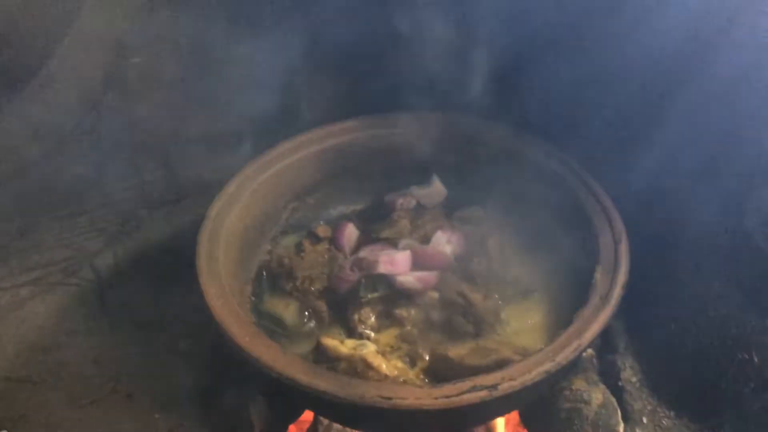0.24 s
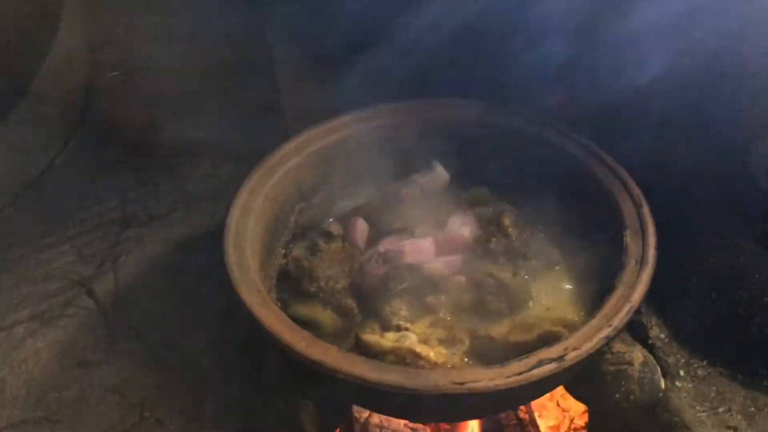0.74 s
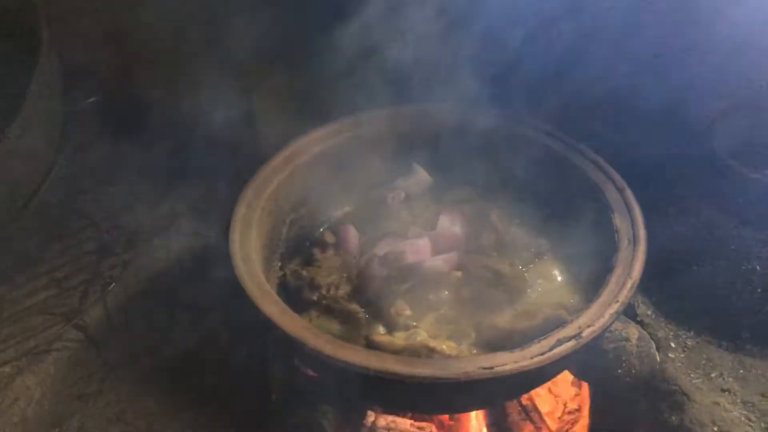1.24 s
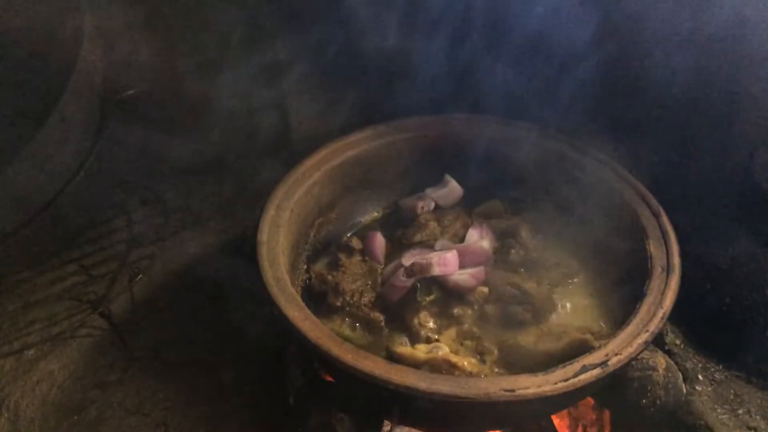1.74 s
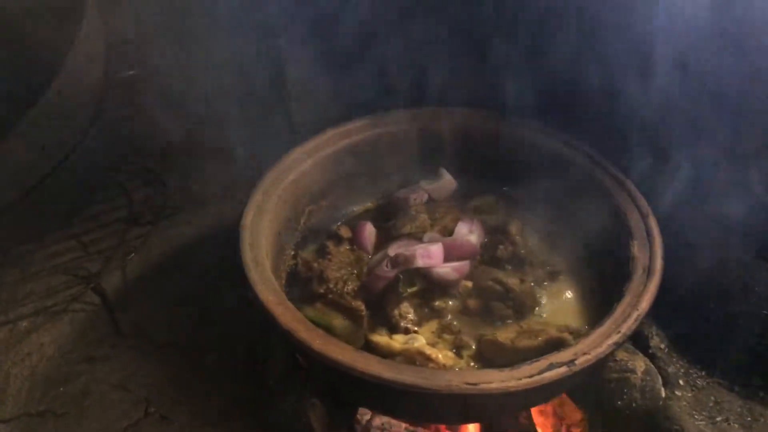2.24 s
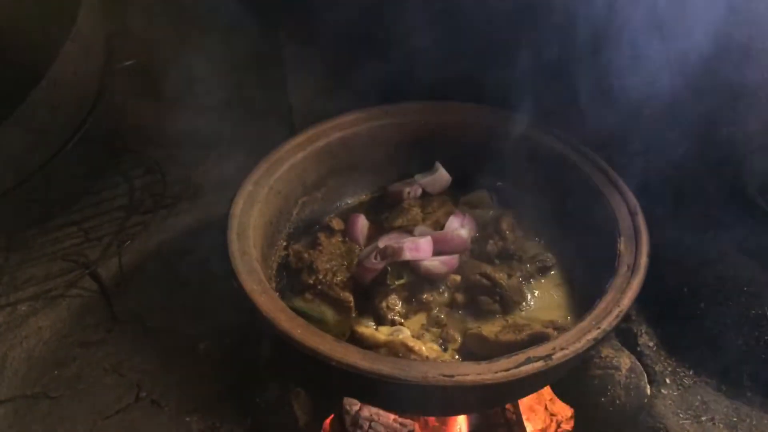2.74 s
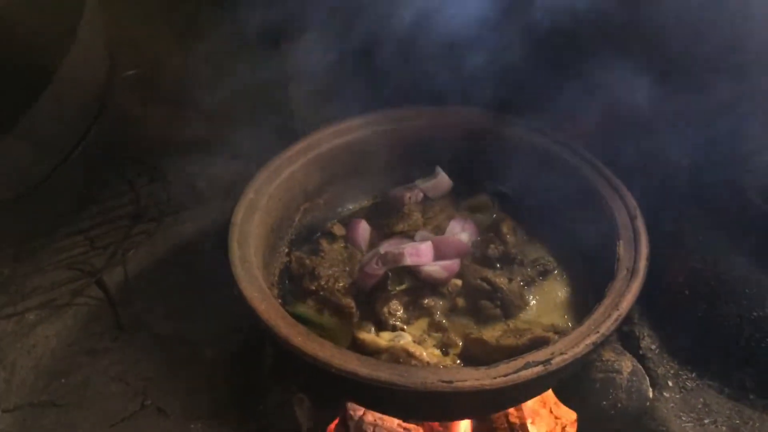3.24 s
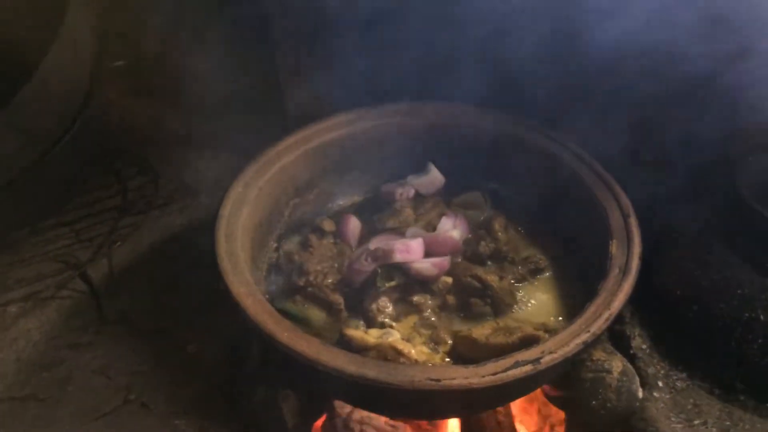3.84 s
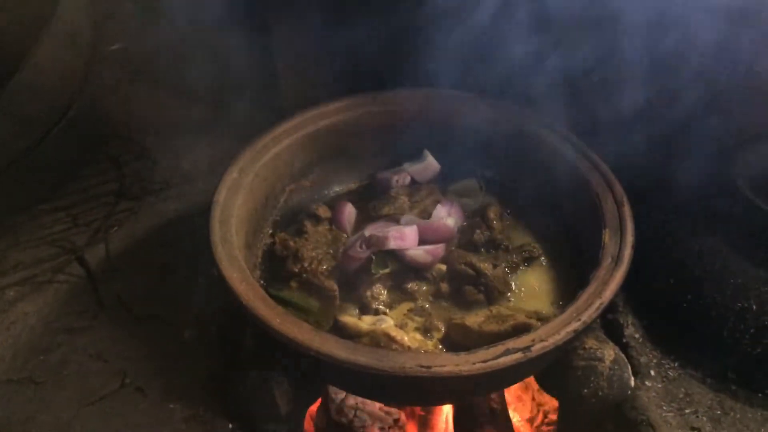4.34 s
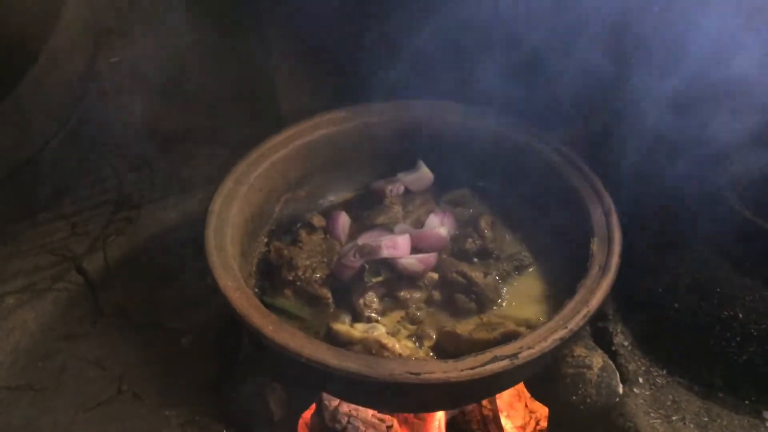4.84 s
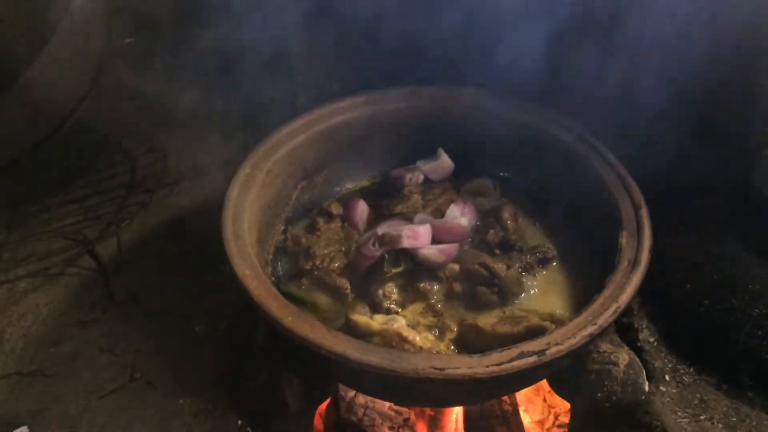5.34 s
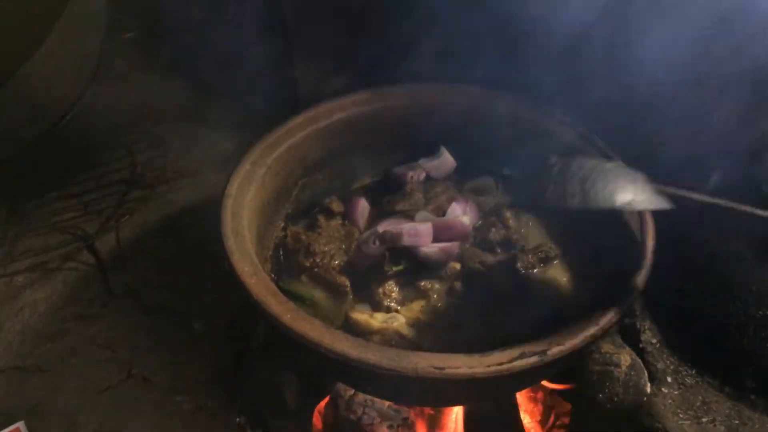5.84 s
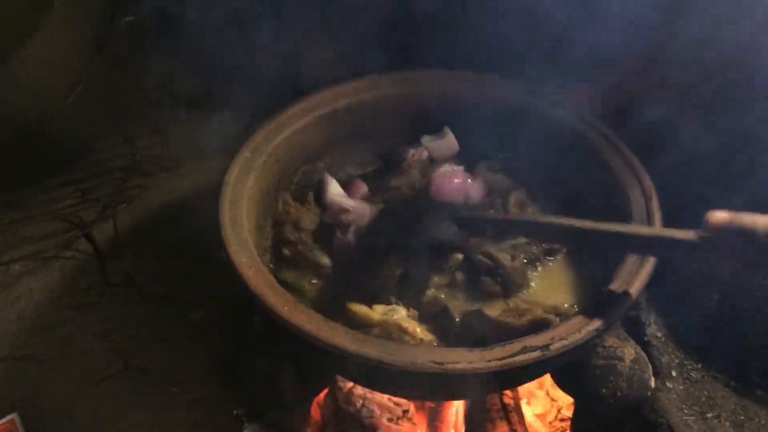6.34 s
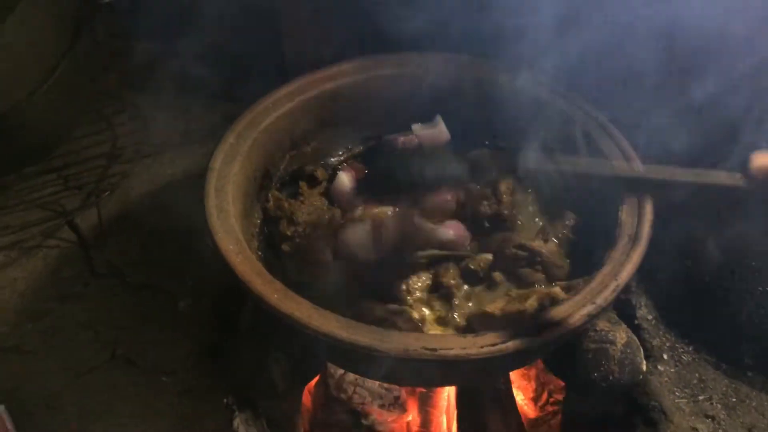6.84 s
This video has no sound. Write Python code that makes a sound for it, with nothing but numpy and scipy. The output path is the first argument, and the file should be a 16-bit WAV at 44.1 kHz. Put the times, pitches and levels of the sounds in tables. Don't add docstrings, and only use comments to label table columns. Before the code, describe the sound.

A cow lows close by from the very start, sagging into a groan and sigh, then a clay pot simmers over fire until a ladle knocks it.

```python
import sys
import numpy as np
from scipy import signal
from scipy.fft import rfft, irfft, next_fast_len
from scipy.io import wavfile
from scipy.ndimage import uniform_filter1d, map_coordinates

SR = 44100
rng = np.random.default_rng(int(sys.argv[2]) if len(sys.argv) > 2 else 0)


def int16_out(signal):
    q = np.round(np.clip(np.atleast_2d(signal).T, -1, 1) * 32767)
    wavfile.write(sys.argv[1], SR, q.astype(np.int16))


def boost(x):
    u = np.asarray(x, float) / 20
    return 10 ** u


N = 313110
TIME = np.arange(N) / SR

# [time_s, pitch_hz, effort_db, brightness_db]
HUM = [
    (0, 100.2, -43, -12.5),
    (.188, 108.9, -47, 3),
    (.245, 108.7, -54, 2),
]
# [time_s, pitch_hz, effort_db, brightness_db]
OPEN_CALL = [
    (0.261, 107.9, -20, 6.5),
    (.385, 115, -20, 0),
    (.5, 113.1, -20.5, -1.5),
    (.85, 110, -24.5, 4),
    (1.037, 103.4, -25, 4),
    (1.136, 101.9, -24.5, 6.5),
    (1.51, 90.06, -27.5, 8),
    (1.64, 77.74, -26, -6.5),
    (1.765, 67.5, -38.5, -10),
]
# [start_s, end_s]
MOUTH_OPENS = (0.225, 0.252)
# [start_s, end_s]
THROAT_SLACKENS = (0.704, 0.82)
# [frequency_hz, gain_db]
NOSE = [(410, -46.5), (700, -8.5), (1150, -26), (1400, -10.5), (1600, -13.5), (2000, -18), (2250, -5),
        (2360, 7), (2600, -20), (2940, -38), (3200, -15), (3420, -10.5), (3960, -51), (4300, -31.5),
        (5590, -37.5), (9460, -93)]
# [frequency_hz, gain_db]
BELLOW = [(410, -31.5), (700, -11.5), (881, 1), (1150, 5.5), (1450, -13.5), (1560, -7.5), (1720, -13.5),
          (1950, -12.5), (2070, -16), (2890, -20.5), (3960, -33), (5080, -45), (5700, -40.5), (6900, -44.5),
          (8970, -91.5), (15200, -120)]
# [frequency_hz, gain_db]
GROAN = [(350, -50), (600, 7), (807, 2.5), (912, 8), (1140, 7.5), (1490, -5.5), (2590, -18), (2870, -25),
         (3700, -30), (4100, -26), (4680, -39), (6900, -37), (8970, -79), (15200, -120)]
# [centre_hz, half_width_hz, gain_db]
MOUTH_RIDGES = [(1110.5, 30, 7.5), (1582, 22, 8.5), (1995, 59, 3.5), (2200, 35, 12.5), (2551, 51, 10),
                (2916, 38, 12.5), (3420, 150, 4.5), (4000, 20, 11)]
# [start_hz, end_hz, half_width_hz, gain_db]
NOSE_GLIDE = (1574, 1320, 70, 12.8)
# [centre_hz, width_hz, level_over_effort_db]
LOW_NOSE = [(110.5, 11, 13), (217, 36, 1.5), (332, 22, 11), (432, 63, 14.5), (640, 66, 6.5)]
# [centre_hz, width_hz, level_over_effort_db]
LOW_MOUTH = [(109.6, 62, -22), (225, 27, -4), (326.5, 12.7, -12), (445, 44, -6), (552, 76, -10),
             (712.4, 40.3, 0)]
# [centre_hz, width_hz, level_over_effort_db]
LOW_SLACK = [(94, 14, -18.5), (138.6, 22, -6.5), (186, 23.4, -5), (226, 8.2, -0.5), (257.6, 26.7, 7.5),
             (333, 71, -5.5), (478.5, 76, 2), (543.6, 17, 2.5)]
# [time_s, depth_db, half_length_s]
FALTERS = [
    (1.003, 4.5, 0.011),
    (1.244, 4.5, 0.062),
    (1.411, 4.5, 0.022),
    (1.656, 2, 0.026),
]
# [time_s, half_length_s, centre_hz, gain_db]
SWAYS = [(0.258, 0.033, 220, -5), (.272, .025, 820, -26), (.272, .018, 1260, -14.5), (0.32, .012, 1200, -7),
         (0.32, .03, 667, 14.5), (0.38, 0.054, 340, 13), (0.51, 0.027, 925, 3), (0.36, 0.027, 1033, -17),
         (.268, 0.0057, 445, 9), (.54, 0.047, 1125, -1), (0.655, .045, 560, -15),
         (0.714, 0.074, 885, -11.5), (0.71, .07, 1122, 1), (0.692, 0.053, 1570, -12),
         (0.764, 0.14, 1330, 10), (0.86, 0.065, 1000, -12), (.8, 0.092, 720, 13), (.8, .04, 1105, -4),
         (0.972, 0.076, 740, 7), (1.04, 0.025, 1150, 6), (1, 0.054, 310, -1), (1.078, 0.081, 103, -7),
         (1.17, 0.07, 720, 10), (1.5, 0.021, 1120, -3), (1.23, 0.062, 790, -14), (1.34, 0.072, 946, 10.5),
         (1.32, 0.092, 190, 1.5), (1.27, 0.093, 900, -10), (1.37, 0.06, 1040, -18),
         (1.449, 0.022, 920, 11.5), (1.42, 0.12, 367.8, -22.5), (1.52, 0.02, 720, 11),
         (1.6, .03, 1140, 3.5), (0.46, .04, 1145, 2.5), (.3, 0.018, 2200, 5), (.31, .03, 1540, 3),
         (0.41, .1, 1920, 8.5), (0.31, .08, 2370, -5), (0.59, 0.11, 1800, 4.5), (.77, 0.043, 2530, 12.5),
         (.86, 0.031, 1870, 14.5), (0.69, .06, 2130, 14), (0.73, .08, 1700, -8.5), (1.1, 0.037, 3100, -11),
         (1.03, .04, 1860, 11), (0.99, 0.053, 1800, 2), (1.18, 0.12, 1630, -20), (1.35, 0.057, 2000, 5.5),
         (1.36, .05, 1700, 6), (1.64, 0.068, 1650, 23)]
# [start_s, attack_s, hold_s, level_db, fall_db_per_s]
SIGH = [
    (1.6, 0.048, 0.36, -32.5, 114),
    (1.74, 0.048, 0.05, -44, 100),
    (2.15, 0.047, 0.018, -49, 151),
]
# [centre_hz, width_hz, gain_db]
SIGH_THROAT = [(439.5, 81, -2.5), (699, 15.6, 3), (856, 22, 2.5), (1167, 25, -6.5), (1480, 130, -5.5),
               (1665, 35, 0), (1820, 41, -3), (2200, 33, -14), (2200, 31, -14), (2480, 80, -12),
               (2900, 63, -10), (3420, 48, -46)]
# [start_s, attack_s, hold_s, level_db, fall_db_per_s]
STRAW = [
    (.325, 0.071, 0.0012, -46.5, 292),
    (.97, 0.078, 0.0012, -49, 31),
    (1.3, 0.013, 0.083, -44, 164),
    (1.42, 0.041, 0.0075, -38, 210),
    (1.6, 0.0072, 0.09, -41.5, 176),
    (1.808, 0.0093, 0.042, -42.5, 144),
    (1.898, 0.027, 0.0037, -50.5, 86),
    (2.14, 0.065, 0.039, -67.5, 170),
]
# [frequency_hz, density_db_per_hz]
STRAW_TONE = [(1470, -39), (2500, -6.5), (3010, -0.5), (4030, -7.5), (7530, -9.5), (13100, -22),
              (15800, -25)]
# [time_s, level_db, softness_hz, damping_by_stew (1 = free rim)]
KNOCKS = [
    (5.9433, -19, 2560, 0.96),
    (5.972, -23.5, 498, 1.3),
    (5.993, -31, 500, 1.8),
    (6.3822, -12, 950, 3.4),
    (6.3939, -20, 500, 1.3),
    (6.691, -30, 1205, 1.5),
    (6.708, -28.5, 500, 0.92),
]
# [pitch_hz, level_db, t60_s]
POT_MODES = [(349, 1, 0.053), (429.5, -0.5, 0.068), (874, -10.5, 0.088), (945, -7, 0.16), (990, -14, 0.1),
             (1280, -10, 0.053), (1366, -10, 0.098), (1760, -4.5, 0.17), (1786, -8.5, 0.19),
             (1874, -5, 0.073), (2755, -27.5, 0.47), (2810, -34, 0.32), (3850, -11, 0.087),
             (4300, -4, 0.035)]
# [time_s, level_db]
SNAPS = [
    (6.591, -28),
    (7.092, -26),
]
# [frequency_hz, density_db_per_hz]
SNAP_TONE = [(350, -41), (600, -11), (1350, -6), (1790, -9), (2590, -8.5), (3140, -1), (4670, -5),
             (6400, -2.5), (15800, -17.5)]
# [start_s, attack_s, hold_s, level_db, fall_db_per_s]
SCRAPE = [
    (6.31, 0.023, 0.06, -44, 370),
    (6.43, 0.022, 0.006, -69, 80),
]
# [frequency_hz, density_db_per_hz]
GRIT_TONE = [(880, -9), (1500, 2), (1830, -2), (2080, -14), (2960, 2), (3940, -1), (4840, -6), (6320, -2),
             (11900, -11), (15800, -48)]
# [start_s, attack_s, hold_s, level_db, fall_db_per_s]
SCRAPE_FIZZ = [
    (6.31, 0.013, 0, -58.5, 200),
    (6.42, 0.027, 0, -49, 131.5),
]
# [time_s, peak_db, pitch_hz, t60_s]
CATCHES = [(6.328, -38, 2790, 0.012), (6.338, -30, 5830, 0.027), (6.356, -38, 6100, 0.042),
           (6.374, -35, 3620, 0.02), (6.333, -36, 5600, .015), (6.342, -37, 3400, .015),
           (6.36, -39.5, 3200, .02), (6.367, -39.5, 5600, .015), (6.38, -37, 5500, .015),
           (6.401, -38.5, 5650, .02), (6.407, -39.5, 3900, 0.014), (6.45, -48, 5000, .02),
           (6.468, -43, 5000, .025), (6.388, -33.5, 4160, 0.034), (6.3957, -38.5, 4140, 0.023),
           (6.662, -36, 3800, 0.098), (6.6833, -36.5, 5000, 0.056), (6.69, -32.5, 6100, 0.046),
           (6.7, -35, 4830, 0.033), (6.718, -37, 4430, .03), (6.67, -41, 2100, 0.052),
           (6.693, -33, 4000, 0.055), (6.708, -28.5, 4000, 0.056), (6.7337, -35, 4000, 0.028)]
# [time_s, peak_db, pitch_hz, t60_s]
TICKS = [(4.122, -42, 3600, 0.025), (4.145, -34, 3600, 0.029), (4.162, -38, 1370, 0.09),
         (4.27, -40, 900, 0.031), (4.043, -48.5, 3600, .015), (4.225, -48, 2800, .015),
         (4.255, -45, 2700, .015), (4.562, -47, 3600, .02), (4.697, -47.5, 2800, 0.018),
         (4.755, -46, 3200, .015), (6.915, -50, 1300, .03), (6.522, -41, 1110, 0.022),
         (6.76, -41.5, 1800, 0.021), (6.792, -46, 2200, .015)]
# [time_s, peak_db, pitch_hz, t60_s]
CLICKS = [
    (3.198, -37, 1490, 0.016),
    (3.229, -37.5, 1750, 0.02),
    (3.2456, -38.5, 1200, .015),
    (4.145, -42, 1500, .025),
    (5.704, -45, 1500, .015),
    (5.236, -37, 1010, 0.018),
]
# [start_s, length_s, pitch_hz, level_db, unsteadiness_share]
CREAKS = [
    (4.08, 0.73, 1450, -63.5, .014),
    (5.58, 0.14, 1330, -61, .008),
    (5.695, 0.25, 1870, -66, .02),
    (1.87, 4, 363, -66, .012),
    (5.606, 0.32, 420, -63, .03),
    (4.2, 0.45, 3700, -69, .04),
    (4.3, .25, 4900, -72, .035),
    (4.25, .25, 5900, -71, .03),
    (2.73, .55, 850, -66, .03),
]
# [time_s, sizzle_db]
SIMMER = [
    (.2, -59),
    (2.35, -62),
    (3.96, -61.5),
    (4.45, -59),
    (4.98, -62),
    (6.32, -60),
    (6.54, -53.5),
    (6.77, -60.5),
]
# [frequency_hz, density_db_per_hz]
SIZZLE_TONE = [(1200, -16), (2000, -9), (2600, -4.5), (4750, -4), (9400, -5.5), (10000, -3), (10700, -6),
               (13800, -6.5), (15800, -10.5)]
# [time_s, draught_db]
FIRE = [(0, -45), (.35, -45), (.7, -49), (1.2, -49.5), (1.72, -43), (2.57, -48.5), (3.2, -44), (3.6, -46.5),
        (3.9, -46), (4.6, -46), (5.1, -51.5), (5.83, -44), (6.15, -48), (6.35, -45.5), (6.74, -48.5),
        (7.1, -46.5)]
# [frequency_hz, density_db_per_hz]
DRAUGHT_TONE = [(15, -57.5), (25, 0), (43, -5.5), (80, 2), (103, -16), (129, -3.5), (200, -18.5),
                (300, -27), (390, -40.5), (660, -120)]
# [time_s, peak_db, pitch_hz]
CRACKLES = [(2.6856, -42.5, 10500), (2.7203, -39, 7020), (2.8234, -47.5, 5060), (2.9995, -42.5, 9800),
            (3.1068, -39, 12800), (3.5406, -37.5, 12400), (3.6194, -36.5, 14500), (3.6958, -43, 5540),
            (3.7353, -40.5, 12800), (4.091, -31, 11600), (4.4272, -37, 9400), (4.753, -28, 11700),
            (5.3262, -49.5, 5600), (5.433, -46.5, 7560), (5.8598, -40.5, 10300), (5.907, -40.5, 10900),
            (5.942, -35, 6000), (5.9897, -36.5, 11900), (6.1814, -43.5, 13500), (6.313, -54.5, 6010)]
# [frequency_hz, density_db_per_hz]
YARD_TONE = [(150, -39.5), (250, -2), (321, -6), (387, 1.5), (416, -6.5), (462, -0.5), (518, -9),
             (936, -6.5), (1160, -9), (1360, -6.5), (1940, -12), (2410, -15), (3000, -20), (3900, -24),
             (6600, -120)]
# [frequency_hz, t60_s]
WALLS = [(150, 0.73), (1000, 0.59), (4000, 0.048), (12000, 0.0046)]

CALL = HUM + OPEN_CALL
CLEAR_SHARE, HOARSE_SHARE, CRACK_HZ, CRACK_SPAN_HZ = .013, .45, 85.5, 6.5
BURST_SHARE, BURST_S = .07, .12
BREATH_GATING = 2
PHASE_SCATTER = .5
JAW_S, JAW_LOWER, JAW_DULL_DB = 0.024, 0.18, 17.5
# (start s, full s), share of the pitch, size scatter
FRAY_S, FRAY_SHARE, FRAY_DB = (.95, 1.3), .0055, 5.5
SWAY_HALF_WIDTH_HZ = 45
ATTACK_RISE_DB = 14
YARD_DB, YARD_FOLLOWS = -58.5, 0.61
TOP_HZ = 15870


def unit(x):
    return x / np.sqrt(np.mean(x ** 2) + 1e-20)


def along(points, hz):
    f, v = np.transpose(points)
    return np.interp(np.log(hz + 1), np.log(f + 1), v)


def curves(rows):
    s, *columns = np.transpose(rows)
    return [np.interp(TIME, s, column) for column in columns]


def during(rows, fade_s):
    inside = np.minimum(TIME - rows[0][0], rows[-1][0] - TIME)
    return np.clip(1 + inside / fade_s, 0, 1)


def wobble(rate):
    knots = rng.standard_normal(int(N * rate / SR) + 4)
    return map_coordinates(knots, [TIME * rate])


def coloured(x, spectrum):
    m = 2 * next_fast_len(len(x) // 2 + 4096)
    gain = boost(along(spectrum, np.fft.rfftfreq(m, 1 / SR)))
    cepstrum = irfft(np.log(gain + 1e-6), m)
    cepstrum[1:m // 2] *= 2
    cepstrum[m // 2 + 1:] = 0
    return irfft(rfft(x, m) * np.exp(rfft(cepstrum)), m)[:len(x)]


def rush(spectrum, patchy_db, grit_db):
    z = signal.stft(rng.standard_normal(N), nperseg=512)[2]
    field = uniform_filter1d(rng.standard_normal(z.shape), size=6, axis=0)
    field = uniform_filter1d(field, size=10, axis=1)
    noise = signal.istft(z * boost(patchy_db * unit(field)), nperseg=512)[1][:N]
    return unit(coloured(noise * boost(grit_db * wobble(900)), spectrum))


def add(track, s, sound):
    part = track[round(s * SR):][:len(sound)]
    part += sound[:len(part)]


def strokes(rows):
    total = 0
    for s, attack, hold, db, fall in rows:
        rise_db = np.minimum(ATTACK_RISE_DB * ((TIME - s) / attack - 1), 0)
        fall_db = fall * np.maximum(TIME - s - attack - hold, 0)
        total = total + boost(db + rise_db - fall_db) * np.clip(1 + (TIME - s) / 0.0091, 0, 1)
    return total


def resonant(rows, hz):
    return np.sqrt(sum(boost(db) ** 2 / (1 + (2 * (hz - centre) / width) ** 2) ** 2 for centre, width, db in rows))


def head_sways(t, partial_hz):
    swayed_db = 0
    for s, half, centre, db in SWAYS:
        away = ((t[::8] - s) / half) ** 2 + ((partial_hz[:, ::8] - centre) / SWAY_HALF_WIDTH_HZ) ** 2
        swayed_db = swayed_db + db * np.exp(-away)
    return boost(swayed_db).repeat(8, axis=1)[:, :len(t)]


def drifting(t, partial_hz):
    place = [partial_hz[:, ::8] / 70, t[::8] * 15 + np.zeros((len(partial_hz), 1))]
    values = map_coordinates(rng.standard_normal((110, 50)), place, order=1)
    return values.repeat(8, axis=1)[:, :len(t)]


def cow():
    n = round((CALL[-1][0] + 0.054) * SR)
    t = TIME[:n]
    hz, effort_db, bright_db = (c[:n] for c in curves(CALL))
    effort_db = effort_db - sum(db * np.exp(-((t - s) / half) ** 2) for s, db, half in FALTERS)
    effort = boost(effort_db)
    slack = np.interp(t, THROAT_SLACKENS, [0, 1])
    mouth = np.interp(t, MOUTH_OPENS, [0, 1])
    parted = np.interp(t, [HUM[-1][0], OPEN_CALL[0][0]], [0, 1])
    opened_s = t - OPEN_CALL[0][0]
    burst = np.exp(-np.abs(opened_s) / BURST_S)
    jaw = parted * np.exp(-np.maximum(opened_s, 0) / JAW_S)

    breath = CLEAR_SHARE + HOARSE_SHARE / (1 + np.exp((hz - CRACK_HZ) / CRACK_SPAN_HZ))
    breath = breath + parted * BURST_SHARE * burst
    shake = breath * .012 + FRAY_SHARE * np.interp(t, FRAY_S, [0, 1])
    phase = 2 * np.pi * np.cumsum(hz * (1 + shake * wobble(45)[:n])) / SR
    k = np.arange(1, 64)[:, None]
    partial_hz = k * hz
    high = np.clip((partial_hz - 1300) / 500, 0, 1)

    opened_db = (1 - slack) * along(BELLOW, partial_hz * (1 + JAW_LOWER * jaw))
    opened_db += slack * along(GROAN, partial_hz)
    for centre, width, db in MOUTH_RIDGES:
        opened_db += db / (1 + ((partial_hz - centre) / width) ** 2)
    sinking_hz = np.interp(t, [0, HUM[-1][0]], NOSE_GLIDE[:2])
    glide_db = NOSE_GLIDE[3] / (1 + ((partial_hz - sinking_hz) / NOSE_GLIDE[2]) ** 2)
    nose_db = along(NOSE, partial_hz) + glide_db
    gain = boost((1 - mouth) * nose_db + mouth * opened_db)
    gain *= effort * np.sqrt(2 / np.sum(gain[6:14] ** 2, axis=0))
    gain *= boost((bright_db - JAW_DULL_DB * jaw) * high)

    low_hz = partial_hz[:6]
    low = (1 - slack) * resonant(LOW_MOUTH, low_hz) + slack * resonant(LOW_SLACK, low_hz)
    low = parted * low + (1 - parted) ** 3 * resonant(LOW_NOSE, low_hz)
    gain[:6] = np.sqrt(2) * effort * low
    gain[6:8] += np.sqrt(2) * effort * slack * resonant(LOW_SLACK, partial_hz[6:8])
    gain[6:] *= np.sqrt(1 - breath)
    gain[:26] *= head_sways(t, partial_hz[:26])

    wax, slip = drifting(t, partial_hz), drifting(t, partial_hz)
    gain[6:] *= boost(((1.5 + 5.5 * high) * np.tanh(wax))[6:])
    slip = (.15 + .85 * mouth) * partial_hz / 1500 * slip * (k > 6)
    slip = slip * (1 + 1.5 * burst) * (1 - breath)
    slip = slip + 2 * np.pi * PHASE_SCATTER * rng.random((63, 1))
    fray_db = FRAY_DB * np.interp(t, FRAY_S, [.15, 1]) * np.tanh(wobble(80)[:n])
    gain *= boost(fray_db * np.clip((partial_hz - 800) / 1200, 0, 1))
    tone = np.sum(gain * np.cos(k * phase + slip), axis=0)

    gate = np.exp(BREATH_GATING * breath * np.cos(phase))
    puffs = coloured(rng.standard_normal(n) * gate, [(700, -6.0), (1300, 0.5), (2500, 11.0), (5000, 9.5)])
    opened = (1 - slack) * unit(coloured(puffs, BELLOW)) + slack * unit(coloured(puffs, GROAN))
    air = mouth * opened + (1 - mouth) * unit(coloured(puffs, NOSE))
    rasp_tone = [(120, -12.0), (250, 7.5), (550, 18.5), (800, -23.5)]
    rasp = unit(coloured(rng.standard_normal(n) * gate, rasp_tone))
    low_rms = np.sqrt(np.sum(gain[1:6] ** 2, axis=0) / 2)
    voice = tone + np.sqrt(breath) * (effort * air + boost(-5.5) * low_rms * rasp)
    voice *= boost(2.5 * breath * wobble(70)[:n])
    return np.pad(voice, (0, N - n)) * during(CALL, 0.04)


def sigh():
    f = np.fft.rfftfreq(N, 1 / SR)
    throat, sign = 0, 1
    for centre, width, db in SIGH_THROAT:
        width = max(width, 28)
        throat = throat + sign * boost(db) * 1j * f * width / (centre ** 2 - f * f + 1j * f * width)
        sign = -sign
    air = unit(irfft(rfft(rng.standard_normal(N)) * throat, N))
    chest = [(130, -20), (230, -8), (400, -3), (700, -5), (1200, -4), (2000, -8), (3500, -20), (6000, -60)]
    air += .45 * rush(chest, patchy_db=3, grit_db=1.5)
    return boost(-3.5) * strokes(SIGH) * air


def ladle():
    out, t = np.zeros(N), np.arange(SR // 3) / SR
    for s, db, soft_hz, damping in KNOCKS:
        ring = 0
        for hz, level, t60 in POT_MODES:
            fading = boost(level + rng.normal(0, 0.44) - 60 * t * damping / t60)
            ring = ring + fading / (1 + (hz / soft_hz) ** 3) * np.sin(2 * np.pi * hz * t)
        clunk_tone = [(150, -20), (350, 0), (soft_hz, -4), (3.3 * soft_hz, -30), (16000, -45)]
        clunk = unit(coloured(rng.standard_normal(len(t)), clunk_tone))
        crack = (boost(-12.0 - 60 * t / 0.021) + boost(-21 - 60 * t * damping / 0.18)) * clunk
        add(out, s, boost(db) * (crack - ring * (1 - np.exp(-t / 0.00091))))
    for s, db in SNAPS:
        snap = unit(coloured(rng.standard_normal(len(t)), SNAP_TONE))
        add(out, s, boost(db - 60 * t / 0.013) * snap)
    grit = rush(GRIT_TONE, patchy_db=4, grit_db=3) * boost(2.5 * wobble(120))
    fizz = rush([(3000, -28.5), (8000, -10), (15800, -9)], patchy_db=-5.0, grit_db=-2.5)
    return out + boost(-2.0) * strokes(SCRAPE) * grit + boost(2.0) * strokes(SCRAPE_FIZZ) * fizz


def ticks():
    out, t = np.zeros(N), np.arange(SR // 10) / SR
    for rows, skirt in [(TICKS, 1), (CATCHES, 1.1), (CLICKS, .3)]:
        for s, db, hz, t60 in rows:
            tone = [(hz / 3, -30), (hz / 1.2, -13 * skirt), (hz, 0), (hz * 1.2, -13 * skirt), (hz * 3, -40 * skirt)]
            burst = unit(coloured(rng.standard_normal(len(t)) + 5 * (t == 0), tone))
            rise = 1 - np.exp(-t * hz)
            add(out, s, boost(db - 6.0 - 60 * t / t60) * rise * burst)
    return out


def creaks():
    out = np.zeros(N)
    for s, length, hz, db, shake in CREAKS:
        arch = np.sin(np.pi * np.clip((TIME - s) / length, 0, 1))
        swell = np.sqrt(np.clip(arch, 0, 1))
        level = boost(db + 4 * wobble(30))
        phase = 2 * np.pi * np.cumsum(hz * (1 + shake * wobble(350))) / SR
        out += level * swell * np.sin(phase)
    return out


def straw():
    rustle = rush(STRAW_TONE, patchy_db=1.5, grit_db=2.5) * boost(1.2 * wobble(50))
    return boost(0.5) * strokes(STRAW) * rustle


def simmer():
    sizzle_db, = curves(SIMMER)
    ducked = np.interp(TIME, [.25, .5, 1.2, 1.9], [0, 1, 1, 0])
    level = boost(sizzle_db - 4 * ducked + .5 * wobble(20))
    out = level * rush(SIZZLE_TONE, patchy_db=.7, grit_db=2)
    bursts = rng.random(N) < 90 / SR
    bubbles = bursts * boost(np.minimum(2.8 * rng.exponential(size=N), 10) - 45)
    return out + coloured(bubbles, [(1000, -38.0), (6000, -19.5), (11000, 1), (16000, 1.0)])


def fire():
    draught_db, = curves(FIRE)
    out = boost(draught_db + 0.5 + 2.0 * wobble(21)) * rush(DRAUGHT_TONE, patchy_db=0.5, grit_db=-4.5)
    t = np.arange(300) / SR
    for s, db, hz in CRACKLES:
        hiss = np.diff(rng.standard_normal(len(t) + 1))
        add(out, s, boost(db - 2 - 60 * t / .004) * (np.sin(2 * np.pi * hz * t) + .35 * hiss))
    return out


def yard():
    sizzle_db, = curves(SIMMER)
    level_db = YARD_DB + YARD_FOLLOWS * (sizzle_db - sizzle_db.mean())
    return boost(level_db + .6 * wobble(5)) * rush(YARD_TONE, patchy_db=.8, grit_db=1)


def walls(x):
    hz, t, z = signal.stft(rng.standard_normal(SR // 2), SR, nperseg=256)
    fading = boost(-60 * t / along(WALLS, hz)[:, None])
    tail = signal.istft(z * fading, SR, nperseg=256)[1]
    late = np.pad(x, (500, 0))
    return signal.fftconvolve(late, tail / np.linalg.norm(tail))[:N]


def scene():
    call = cow()
    near = ladle() + ticks() + creaks()
    call_echo = boost(-14) * walls(coloured(call, [(250, -9), (900, -2), (1800, 0)]))
    near_echo = boost(-29.0) * walls(near)
    mix = call + call_echo + sigh() + near + near_echo + straw() + simmer() + fire() + yard()
    return mix[None]


def top_cut(x):
    return signal.sosfilt(signal.butter(12, 16650, fs=SR, output="sos"), x)


def record(dry):
    f = np.fft.rfftfreq(N, 1 / SR)
    bass_cut = f ** 4 / (f ** 4 + 40 ** 4)
    mix = irfft(rfft(dry) * (f < TOP_HZ) * bass_cut, N)
    return top_cut(mix)


dry = scene()
out = record(dry)
int16_out(out)
```